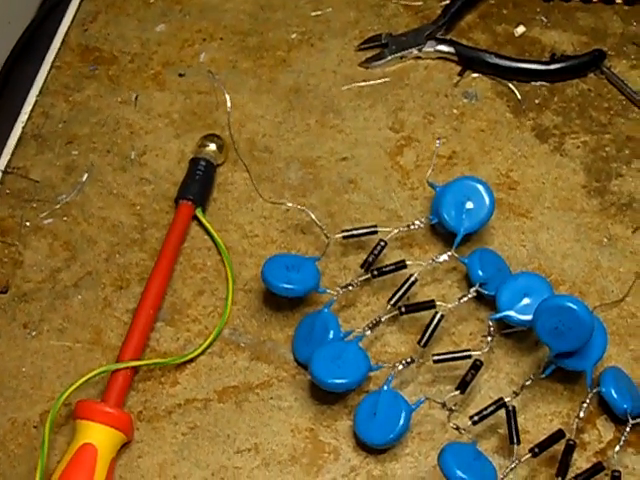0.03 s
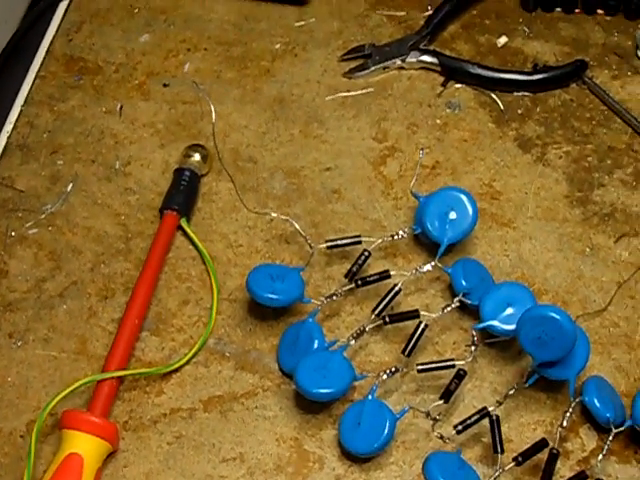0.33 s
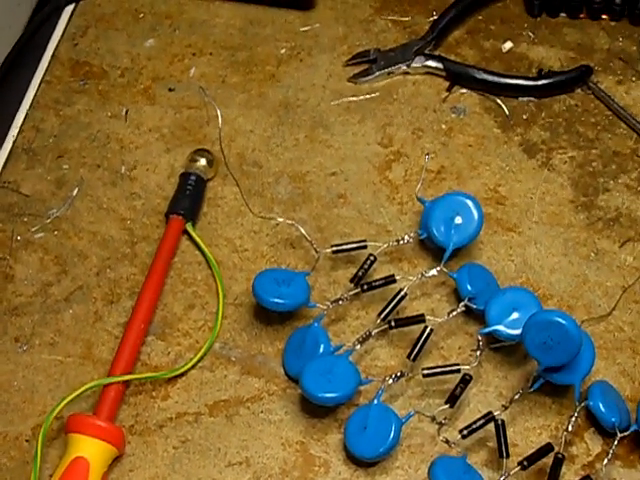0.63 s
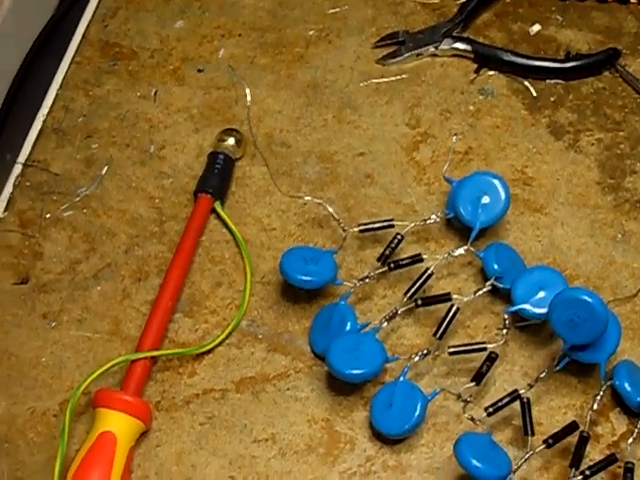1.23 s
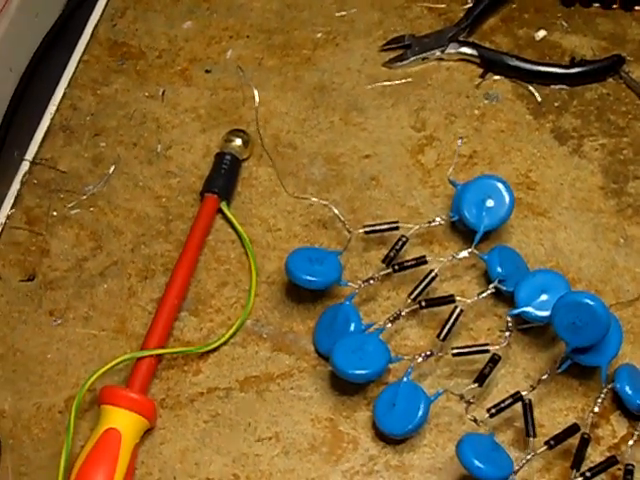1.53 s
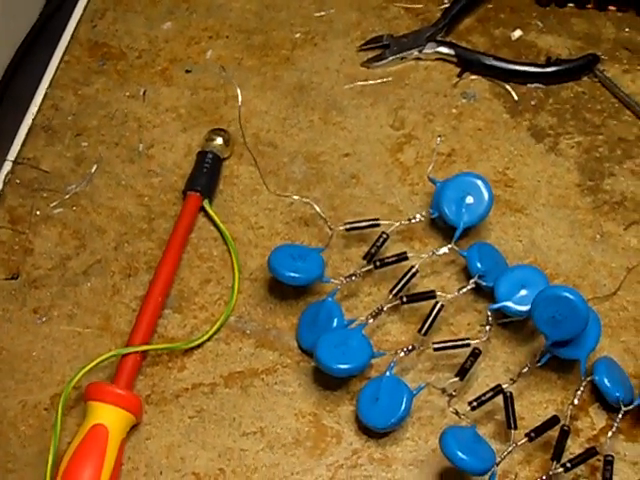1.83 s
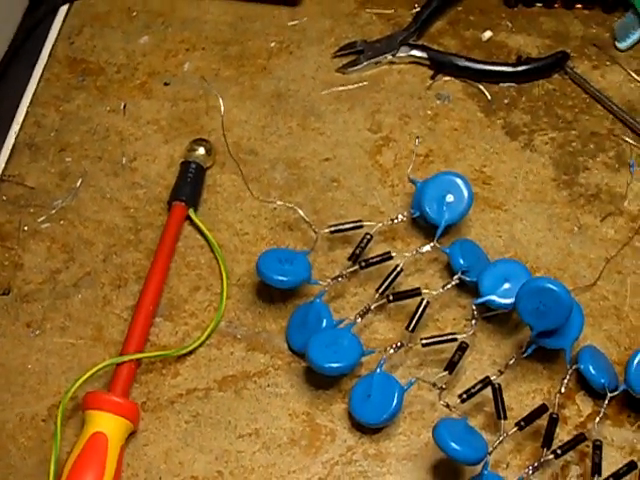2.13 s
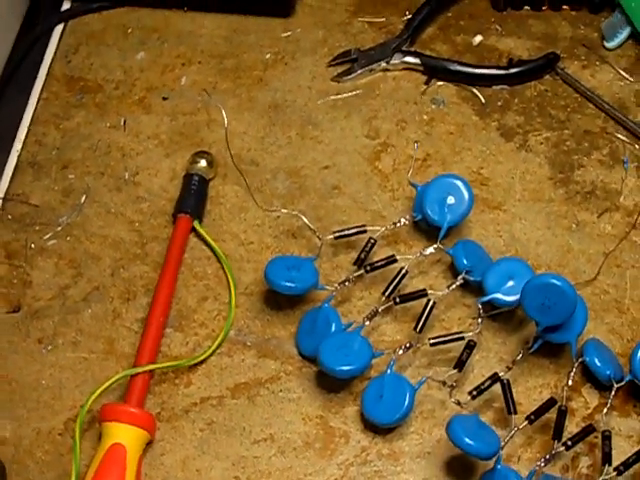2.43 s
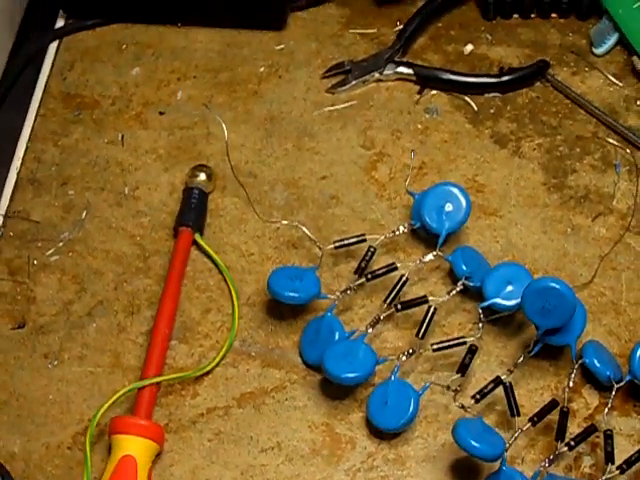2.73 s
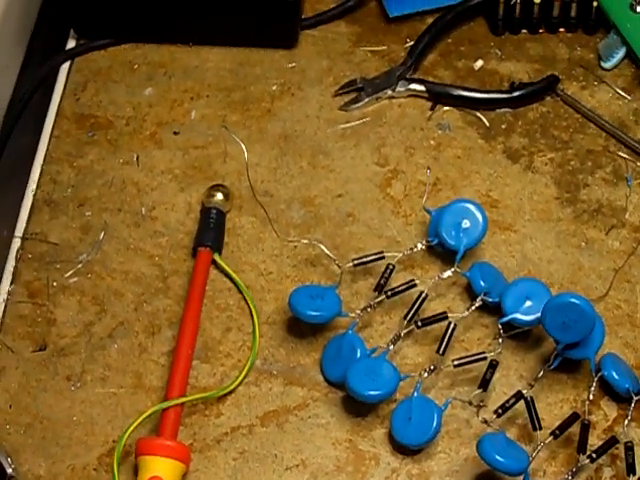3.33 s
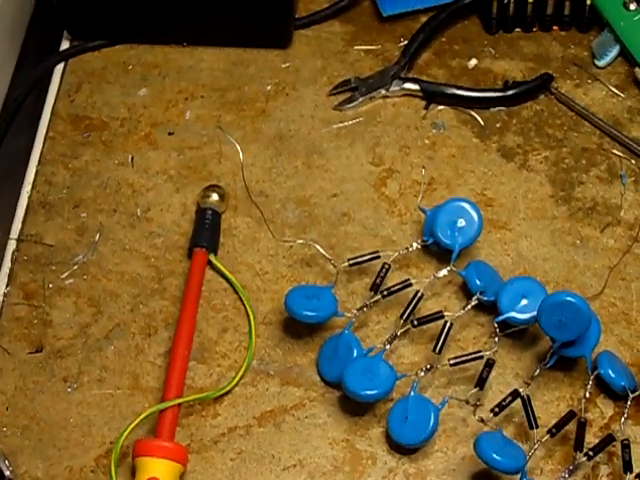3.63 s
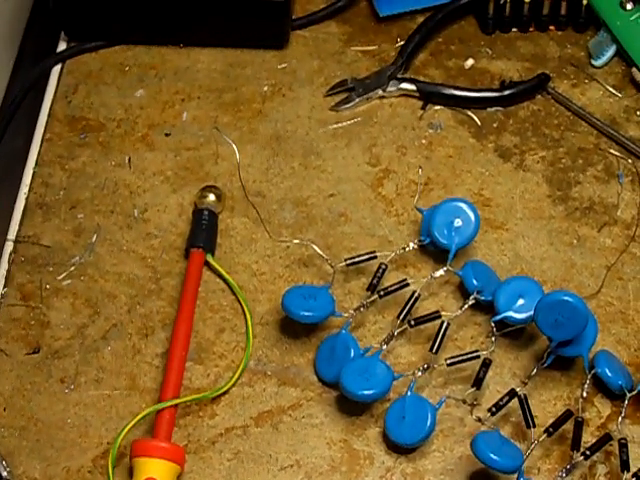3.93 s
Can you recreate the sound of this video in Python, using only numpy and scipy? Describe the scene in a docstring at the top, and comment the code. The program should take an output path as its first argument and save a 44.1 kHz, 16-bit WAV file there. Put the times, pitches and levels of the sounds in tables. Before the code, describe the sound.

A high-voltage spark cracks sharply close to the microphone, with a brief hissing echo and a short buzz. About a second later something hard clatters and scrapes on a workbench. Low hum and hiss remain in the small, quiet room.

```python
"""A high-voltage multiplier sparks over on a workbench, close to a microphone, in a small quiet room.
One spark is already dying away; a second strikes at 0.1 s. Each cracks, hisses away in the room and
jolts the microphone input, which buzzes briefly as it settles. A faint tick follows and the
background dips. From 1.1 s something hard clatters and scrapes on the bench, and a small metal
part pings. Room rumble, a low hum and microphone hiss run underneath to the end."""
import sys
import numpy as np
from scipy import signal
from scipy.fft import rfft, irfft
from scipy.io import wavfile

SR = 44100
rng = np.random.default_rng(int(sys.argv[2]) if len(sys.argv) > 2 else 0)


def int16_out(signal):
    """Quantize to a 16-bit WAV file."""
    q = np.round(np.clip(np.atleast_2d(signal).T, -1, 1) * 32767)
    wavfile.write(sys.argv[1], SR, q.astype(np.int16))


N = 4 * SR

# Resonances of the hard object. Each row: frequency in Hz, width in Hz, relative level in dB.
OBJECT_MODES = [(468, 67, 13.5), (710, 87, 8.5), (830, 60, 4), (974, 110, 9), (1102, 15.6, 25.5),
                (1460, 220, 6), (1895, 100, 12.5), (2480, 120, 14), (2800, 220, 2), (3400, 78, 5),
                (3800, 130, -1)]


def undb(db):
    """Decibels to gain."""
    return 10 ** (np.asarray(db) / 20)


def unit(x):
    """Scale to unit energy."""
    return x / np.sqrt(np.sum(x ** 2))


def add(out, x, start_s):
    """Mix x into out at start_s, dropping what falls outside."""
    i = int(round(start_s * SR))
    x, i = x[max(-i, 0):], max(i, 0)
    out[i:i + len(x)] += x[:len(out) - i]


def second():
    """Time axis of one second."""
    return np.arange(SR) / SR


def fade(t60_s):
    """Exponential decay, one second long."""
    return np.exp(-np.log(1000) * second() / t60_s)


def at(table, hz):
    """Read a table on a log-frequency axis."""
    points_hz, values = np.array(table).T
    return np.interp(np.log(np.maximum(hz, 1)), np.log(points_hz), values)


def curve(table):
    """Gain over time from (s, dB) points."""
    return undb(np.interp(np.arange(N) / SR, *np.array(table).T))


def colour(x, spectrum):
    """Minimum-phase filter through (Hz, dB) points."""
    n = 2 * len(x)
    gain = undb(at(spectrum, np.fft.rfftfreq(n, 1 / SR)))
    cepstrum = irfft(np.log(gain))
    cepstrum[1:n // 2] *= 2
    cepstrum[n // 2 + 1:] = 0
    return irfft(rfft(x, n) * np.exp(rfft(cepstrum)))[:len(x)]


def burst(t60_s):
    """Decaying noise of unit energy."""
    return unit(rng.standard_normal(SR) * fade(t60_s))


def ring(modes):
    """Impulse response of a set of damped resonances."""
    t = second()
    return sum(undb(db) * 2 * np.pi * width_hz / SR * np.exp(-np.pi * width_hz * t)
               * np.cos(2 * np.pi * hz * t) for hz, width_hz, db in modes)


def crack():
    """A shock pulse and its near reflections ring briefly, scatter off clutter and fill the room."""
    # Resonances colouring the crack. Each row: frequency in Hz, width in Hz, relative level in dB.
    modes = [(330, 66, -10), (650, 79, 4), (1060, 79, -9), (1860, 130, -12), (2637, 140, -16.5),
             (3340, 197, -17), (3780, 180, -10), (4900, 230, -11.5), (6870, 396.6, -4.5), (7200, 200, -0.5),
             (9136, 180, -3.5), (9720, 400, -6.5), (12100, 200, -9), (12810, 290, .5), (14210, 370, -4),
             (14600, 300, -6)]
    # Direct path, then off the bench and nearby parts. Each row: delay in ms, level in dB.
    paths = [(0, 0), (.92, -5), (1.8, -14), (2.3, -13), (3.5, -22), (5.1, -21), (10.6, -22), (11.6, -17),
             (15.6, -18)]
    # Spectrum of the echo. Each row: frequency in Hz, relative density in dB.
    echo_spectrum = [(200, -34.5), (700, -27), (2000, -17), (5000, -12), (7000, -9), (10500, -6),
                     (13000, 1.5), (16000, -1)]
    pulse = undb(10) * ring(modes)
    pulse[0] += undb(-30)  # broadband snap
    near = np.zeros(SR)
    for delay_ms, db in paths:
        add(near, -undb(db) * pulse, delay_ms / 1000)
    scatter = undb(2) * unit(colour(burst(t60_s=0.025), echo_spectrum))
    echo = undb(-2.5) * unit(colour(room(), echo_spectrum))
    return near + scatter + echo


def room(delay_s=0.0075):
    """Diffuse room echo: arrives slightly late and lasts longest in the mid band."""
    # Room decay. Each row: band centre in Hz, T60 in s.
    decay = [(150, 0.3), (1000, 0.47), (3000, 0.53), (7000, 0.45), (14000, 0.28)]
    hz = np.fft.rfftfreq(SR, 1 / SR)
    noise = rfft(rng.standard_normal(SR))
    centres_hz = [centre_hz for centre_hz, _ in decay]
    tail = np.zeros(SR)
    for share, (_, t60_s) in zip(np.eye(len(decay)), decay):
        band_gain = at(list(zip(centres_hz, share)), hz)
        tail += irfft(noise * band_gain) * fade(t60_s)
    return unit(tail * (second() > delay_s))


def jolt(rise_s=0.0015, drain_s=0.054, instant_share=0.48, settle_hz=1.6, settle_q=0.8):
    """The discharge kicks the microphone input; the step drains and swings slowly back to rest."""
    t = np.arange(N) / SR
    rise = 1 - (1 - instant_share) * np.exp(-t / rise_s)
    step = -undb(-9) * rise * np.exp(-t / drain_s)
    omega = 2 * np.pi * settle_hz
    highpass = signal.bilinear([1, 0, 0], [1, omega / settle_q, omega ** 2], SR)
    return signal.lfilter(*highpass, step)


def buzz(length_s, hz=86.13, start_db=-40, fade_db_per_s=45.5):
    """A fading sawtooth while the input settles in small steps."""
    t = second()
    sawtooth = 0.5 - (t * hz) % 1
    taper = np.clip((length_s - t) * hz, 0, 1)
    return sawtooth * taper * undb(start_db - fade_db_per_s * t)


def sparks(buzz_delay_s=0.1425, buzz_max_s=0.185):
    """Crack, jolt and buzz for each spark; a new spark cuts the previous buzz short."""
    # Discharges, the first already over at time zero. Each row: start in seconds, level in dB.
    discharges = [(-0.1241, -2), (0.1081, 0)]
    out = np.zeros(N)
    next_starts_s = [start_s for start_s, _ in discharges[1:]] + [np.inf]
    for (start_s, db), next_s in zip(discharges, next_starts_s):
        add(out, undb(db) * crack(), start_s)
        add(out, undb(db) * jolt(), start_s)
        buzz_start_s = start_s + buzz_delay_s
        add(out, buzz(min(buzz_max_s, next_s - buzz_start_s)), buzz_start_s)
    return out


def rumble_and_hiss(crossover_hz=7700):
    """Room rumble that swells and sinks, under steady microphone hiss."""
    # Noise floor. Each row: frequency in Hz, relative density in dB.
    floor_spectrum = [(20, 0), (53, -13.5), (87, -9.5), (120, -10.5), (148, -19), (180, -17), (266, -22.5),
                      (465, -22), (534, -29), (705, -26), (1100, -30.5), (2540, -32.5), (3750, -36),
                      (15500, -47.5)]
    # Swell of the rumble. Each row: time in seconds, gain in dB.
    swell = [(0, 2), (.2, -13.5), (.5, 3.5), (1.0, 0.5), (1.5, -5), (1.9, 0), (2.6, 1.5), (3.5, -1.5),
             (4, -5.5)]
    noise = undb(-59.5) * np.sqrt(N) * unit(colour(rng.standard_normal(N), floor_spectrum))
    rumble = signal.sosfiltfilt(signal.butter(1, crossover_hz, fs=SR, output="sos"), noise)
    hiss = undb(8.5) * (noise - rumble)
    return curve(swell) * rumble + hiss


def hum(hz=85.2, width_hz=20, octave_db=-17):
    """A wavering low hum that fades in: narrow bands of noise at one pitch and its octave."""
    # Swell of the hum. Each row: time in seconds, gain in dB.
    swell = [(0, -29.5), (1.0, -11), (1.5, 2), (1.75, 3), (2.15, 2.5), (2.3, -0.5), (2.8, 0), (3.55, 2),
             (3.75, 4), (4, 4)]
    response = ring([(hz, width_hz, 0), (2 * hz, width_hz, octave_db)])
    drone = signal.fftconvolve(rng.standard_normal(N + SR - 1), response, "valid")
    return curve(swell) * undb(-62.5) * np.sqrt(N) * unit(drone)


def faint_tick(start_s=0.45, length_s=0.034):
    """A soft, slightly rasping tick as the spark's echo ends."""
    # Resonances of the tick. Each row: frequency in Hz, width in Hz, relative level in dB.
    modes = [(950, 98, 2.5), (3090, 170, -2)]
    out = np.zeros(N)
    window = np.sin(np.pi * np.minimum(second() / length_s, 1)) ** 2
    rasp = rng.standard_normal(SR) * window
    add(out, undb(-33.5) * unit(signal.fftconvolve(rasp, ring(modes))), start_s)
    return out


def dip(centre_s=0.52, width_s=0.1, depth_db=-4.5):
    """Gain of the background: sinks briefly after the crack and comes back."""
    t = np.arange(N) / SR
    return undb(depth_db * np.exp(-((t - centre_s) / width_s) ** 2))


def strike(response, grit=1.6):
    """Excite a response with a clean blow plus the chatter of the surfaces as they meet."""
    contact = grit * burst(t60_s=0.02)
    contact[0] += 1
    return unit(signal.fftconvolve(contact, response)[:SR])


def struck_spot(hz, width_hz=65):
    """Short, hollow ring of the spot that is hit."""
    t = second()
    return unit(np.sin(2 * np.pi * hz * t) * np.exp(-np.pi * width_hz * t))


def knocks(detune=0.02, body_top_hz=5130):
    """Each knock thuds in the bench, rings the object, clicks with a loose rattle and ticks."""
    # Each row: start in seconds, relative levels in dB of thud, body, click and bright tick,
    # frequency of the struck spot in Hz, its relative level in dB.
    blows = [(1.1232, -41, -10, -14, -29, 795, -1), (1.1305, -26, -4.5, -13, -14, 3420, -10),
             (1.137, -1.5, -21, -34, -25, 452, 3), (1.1885, -8, -16, -13.5, -10, 792, -6.5),
             (1.197, -4, -20, -24, -25, 450, -20), (1.2166, -1.5, -1, -7, -8.5, 1070, 0.5),
             (1.2577, -6.5, -8.5, -1.5, 3, 725, -13), (1.2847, -4.5, -34, -8, -12, 197, -5.5),
             (1.321, -15.5, -24, -9, -11.5, 210, -11)]
    # Spectra of bench thud and contact click. Each row: frequency in Hz, relative density in dB.
    thud_spectrum = [(30, -15), (60, -5), (95, 0), (140, -10), (200, -3.5), (300, -2), (450, -9.5),
                     (600, -6), (2000, -36)]
    click_spectrum = [(300, -12), (1500, -1), (3200, 6), (5000, 0.5), (7000, -13), (9000, -4), (13000, -33),
                      (16000, -17)]
    # Resonances of the bright tick. Each row: frequency in Hz, width in Hz, relative level in dB.
    tick_modes = [(7170, 2600, 5), (10100, 700, 10), (10900, 700, -6), (12350, 900, 9), (14300, 1500, 6)]
    out = np.zeros(N)
    tick = ring(tick_modes)
    soft_blow = signal.butter(2, body_top_hz, fs=SR)  # too soft to ring the object higher up
    for start_s, thud_db, body_db, click_db, tick_db, spot_hz, spot_db in blows:
        pitch = 1 + detune * rng.uniform(-1, 1)  # each knock lands on another spot
        modes = [(hz * pitch, width_hz, db) for hz, width_hz, db in OBJECT_MODES]
        body = signal.lfilter(*soft_blow, ring(modes))
        thud = unit(colour(burst(t60_s=0.046), thud_spectrum))
        contact = burst(t60_s=0.003)
        rattle = undb(6.5) * burst(t60_s=0.05)
        click = unit(colour(contact + rattle, click_spectrum))
        add(out, undb(thud_db - 14) * thud, start_s)
        add(out, undb(body_db - 12.5) * strike(body), start_s)
        add(out, undb(click_db - 14) * click, start_s)
        add(out, undb(tick_db - 15) * strike(tick), start_s)
        add(out, undb(spot_db - 17) * struck_spot(spot_hz), start_s)
    return out


def scrape(catches_per_s=1200, spread_db=3):
    """Between knocks the object drags on the bench: dense, uneven catches that fade as it slows."""
    # Each row: start in seconds, length in seconds, relative level in dB.
    slides = [(1.134, 0.026, -4.5), (1.223, 0.041, -2.5), (1.262, 0.042, -3.5)]
    # Scraped bench surface. Each row: frequency in Hz, relative density in dB.
    surface_spectrum = [(150, -7), (450, 5), (800, 6), (1200, -3), (1500, 1.5), (2500, 1.5), (3600, -24),
                        (6000, -23), (15000, -34)]
    t, catches = second(), np.zeros(N)
    for start_s, length_s, db in slides:
        caught = rng.random(SR) < catches_per_s / SR
        signs = rng.choice([-1, 1], SR)
        grains = caught * signs * undb(spread_db * rng.standard_normal(SR))
        slowing = np.sqrt(np.clip(1 - (t / length_s) ** 2, 0, 1))
        add(catches, undb(db) * slowing * grains / np.std(grains), start_s)
    surface = undb(-47.5) * unit(colour(signal.unit_impulse(SR), surface_spectrum))
    body = undb(-49) * unit(ring(OBJECT_MODES))
    return signal.fftconvolve(catches, surface + body)[:N]


def ping(hz=10960):
    """A small metal part rings at one high frequency."""
    return undb(-47) * np.sin(2 * np.pi * hz * second()) * fade(t60_s=0.15)


def clatter(echo_db=-6.5):
    """Knocks and scrapes with a damped room echo; the last knock sets off the ping."""
    direct = scrape() + knocks()
    damped_room = unit(room() * fade(t60_s=1.8))
    out = direct + undb(echo_db) * signal.fftconvolve(direct, damped_room)[:N]
    add(out, ping(), start_s=1.321)
    return out


def scene():
    """Sparks, tick, clatter and the quiet room at one microphone."""
    events = sparks() + faint_tick() + clatter()
    background = rumble_and_hiss() + hum()
    return (events + dip() * background)[None]


def record(dry):
    """The recorder cuts the top with a steep low-pass."""
    top_hz = 15700
    return signal.sosfilt(signal.ellip(10, 0.2, 80, top_hz, fs=SR, output="sos"), dry)


dry = scene()
out = record(dry)
int16_out(out)
```